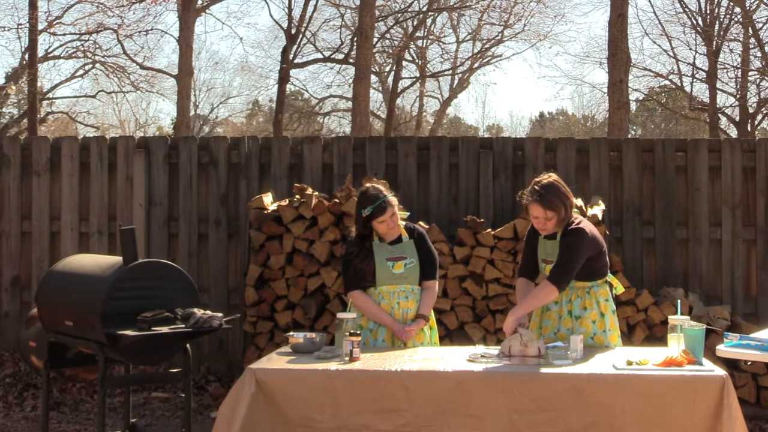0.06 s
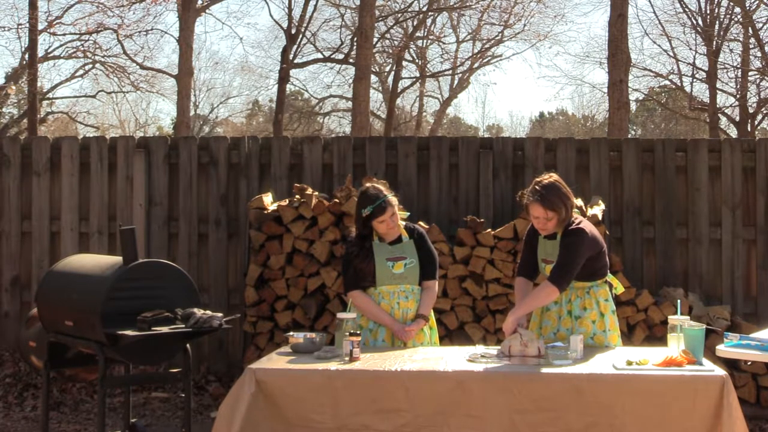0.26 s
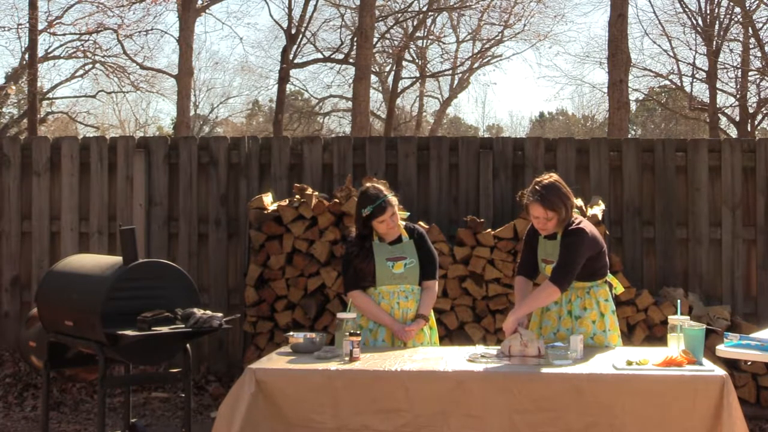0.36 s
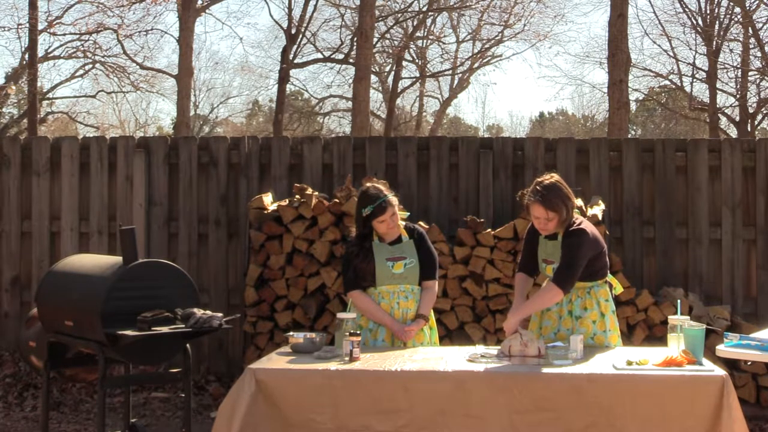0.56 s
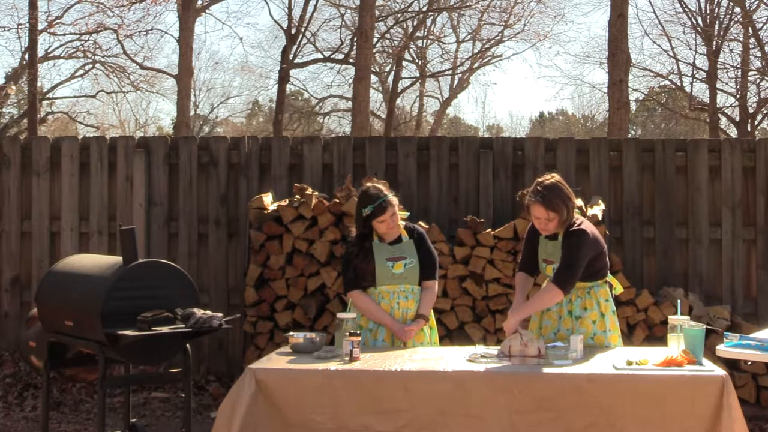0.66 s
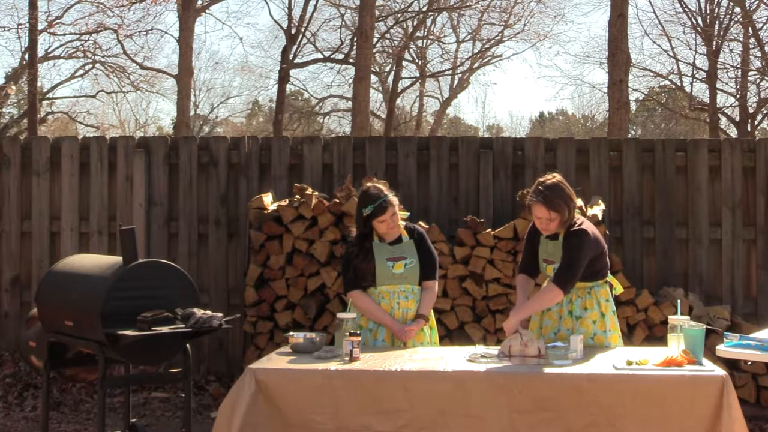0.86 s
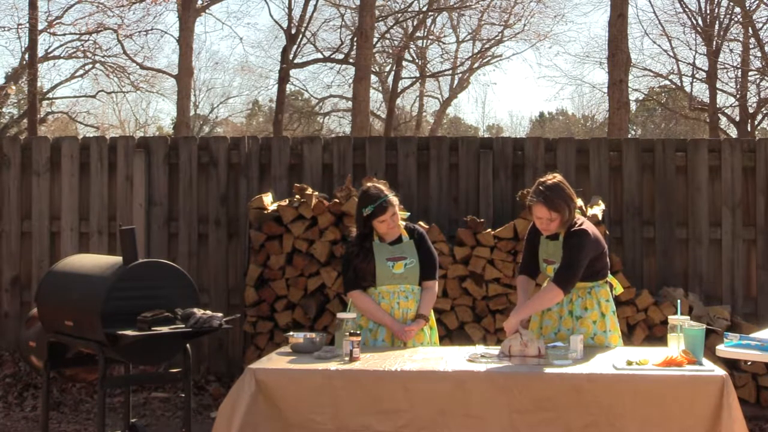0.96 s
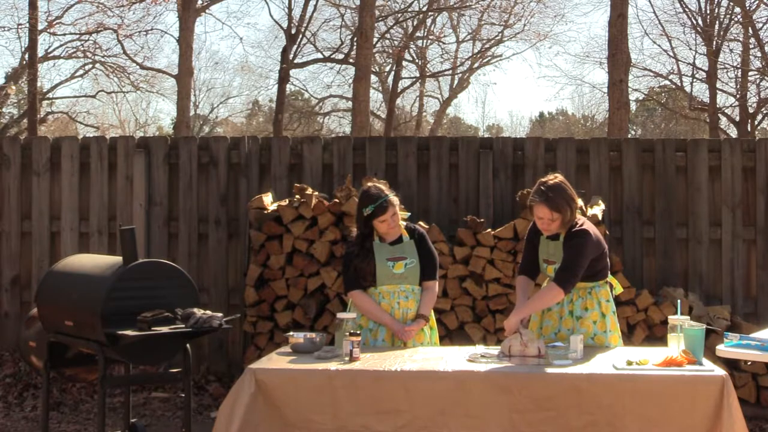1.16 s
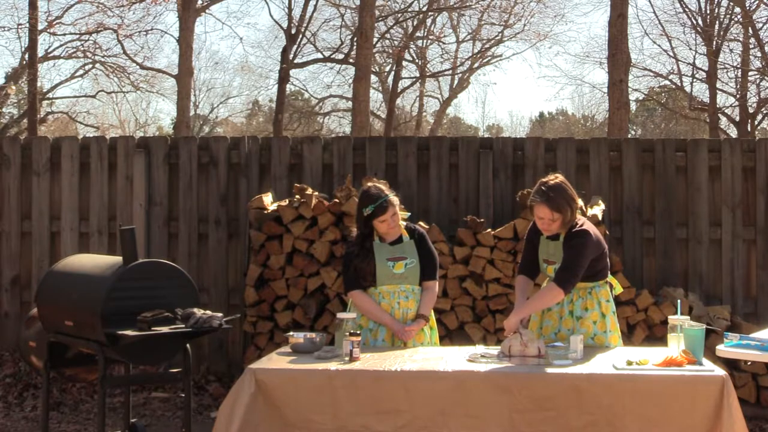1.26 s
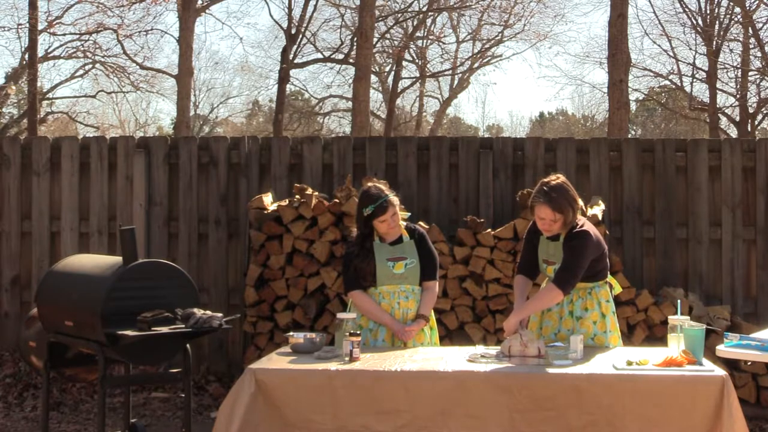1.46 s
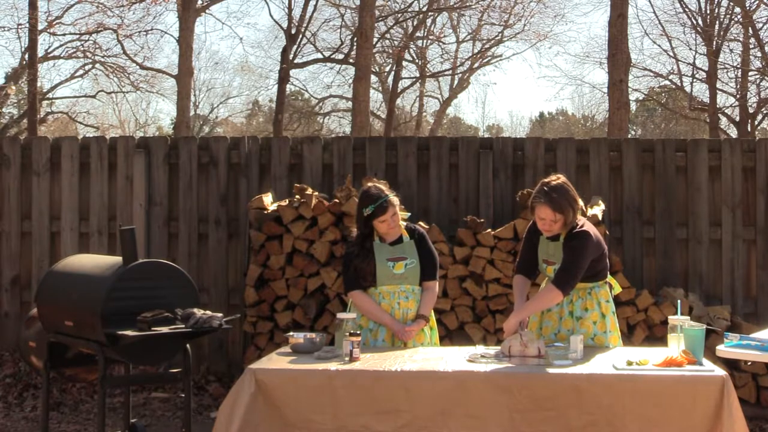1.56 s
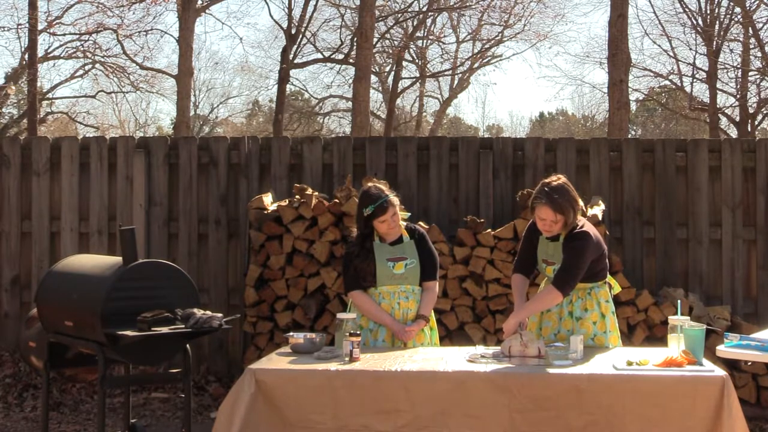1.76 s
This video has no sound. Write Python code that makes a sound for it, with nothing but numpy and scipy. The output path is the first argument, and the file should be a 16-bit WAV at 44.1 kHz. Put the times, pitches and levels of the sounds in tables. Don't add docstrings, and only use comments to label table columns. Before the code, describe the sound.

Kitchen shears snap through chicken bone near the start, one bright, dry crack with quick yard reflections and a soft diffuse tail; afterward only faint low hum, distant traffic and tiny wet ticks, picked up by one microphone.

```python
import sys
import numpy as np
from scipy import signal
from scipy.io import wavfile
from scipy.ndimage import uniform_filter1d

SR = 44100
rng = np.random.default_rng(int(sys.argv[2]) if len(sys.argv) > 2 else 0)


def bounce(signal):
    frames = np.transpose(np.atleast_2d(signal))
    limited = np.clip(frames, -1, 1)
    pcm = np.round(limited * 32767).astype(np.int16)
    wavfile.write(sys.argv[1], SR, pcm)


def voltage_ratio(decibels):
    exponent = np.asarray(decibels, float) / 20
    return 10 ** exponent


N = 79380

# (time [s], level [dB])
FRACTURES = [
    (.20335, -26),
    (.20365, -10),
    (.20408, -11),
    (.20535, -12),
    (.2062, -16),
    (.2078, -23),
    (.2088, -25),
    (.2100, -25),
    (.2113, -28),
]
# (frequency [Hz], level [dB], T60 [s])
BLADE_MODES = [(1800, -7, .007), (2280, -3, .008), (2800, -14, .007), (3550, -11, .007), (4250, -2, .008),
               (4710, 0, .008), (5510, -3, .008), (6600, -14, .007), (7130, -12, .007), (7900, -15, .006),
               (8900, -14, .004), (10200, -13, .003), (12500, -13, .003), (15000, -13, .003)]
# (frequency [Hz], level [dB], T60 [s])
STEEL_MODES = [(4199, -45, .4), (4320, -48, .5), (4770, -46, .4)]
# (level [dB], centre [Hz], bandwidth [Hz])
NEAR_REFLECTION = (-6, 4700, 2000)
# (arrival [s], level [dB], centre [Hz], bandwidth [Hz], smear [s])
REFLECTIONS = [(0.213, -17, 7800, 1500, 0.0012), (0.213, -31.5, 11800, 2040, 0.0022),
               (0.2172, -32, 2300, 1500, .003), (0.218, -25.5, 4230, 1500, 0.0044),
               (0.2215, -32.5, 2079, 1187, .007), (0.224, -31.5, 4500, 1500, 0.0043),
               (0.227, -30.5, 7400, 2000, 0.0062), (0.2284, -26.5, 4176, 2000, 0.0036),
               (.228, -41, 2012, 1200, 0.0059), (0.236, -39.5, 4992, 4009, .012),
               (.266, -43.5, 2100, 1190, 0.016), (.271, -38, 4280, 790, 0.0099),
               (0.264, -42.5, 6800, 3560, 0.014), (0.254, -67, 12000, 9000, 0.018),
               (0.311, -51.5, 2200, 1500, 0.015), (0.313, -69, 7850, 6030, 0.0079),
               (.333, -81, 6500, 2830, 0.0076), (0.402, -60, 3040, 5000, 0.0029),
               (0.411, -57, 10000, 14000, 0.0048), (0.411, -64.5, 8540, 6000, 0.018),
               (0.435, -64.5, 4400, 5000, .012)]
# (frequency [Hz], level [dB], T60 [s])
SCATTER = [(1300, -25.5, 0.23), (1798, -16.5, 0.44), (2360, -18.5, 0.57), (3200, -20.5, 0.34),
           (4370, -17.5, .6), (6500, -16, .3), (9000, -19, 0.24), (12770, -20, .22)]
# (time [s], level [dB], frequency [Hz], T60 [s])
TICKS = [(0.145, -65.5, 8600, .04), (.154, -58.5, 2220, .06), (0.1614, -42, 2337, 0.028),
         (0.1618, -45, 9000, .005), (.174, -51.5, 2140, 0.15), (.166, -64.5, 4500, 0.18),
         (.508, -59.5, 7980, 0.0065), (.655, -62, 7500, .01), (.659, -68, 7400, .04),
         (0.694, -59.5, 6920, 0.0055), (1.1615, -63, 6500, 0.015), (1.1617, -60.5, 2660, .02),
         (1.1917, -60, 2620, .02), (1.2865, -61, 4000, .003), (1.392, -61, 7000, 0.0026),
         (1.501, -61.5, 3500, .02), (1.5406, -56.5, 3200, 0.0047), (1.618, -57, 7500, 0.0032),
         (1.62, -62, 6970, 0.0045), (1.6255, -51.5, 5934, 0.0026), (1.632, -65.5, 7100, 0.11)]
# (time [s], level [dB], centre [Hz], bandwidth [Hz], fade [s])
BOARD_KNOCKS = [
    (.203, -40.5, 620, 200, 0.011),
    (.203, -44, 480, 141, 0.013),
    (.204, -40, 1300, 400, 0.003),
    (.212, -55, 1004, 400, .02),
    (.302, -51, 674, 50.4, 0.017),
    (.338, -56, 703, 60, 0.019),
]
# (time [s], frequency [Hz], level [dB])
STRONG_HUM = [
    (0, 103.7, -52),
    (.5, 103, -54.5),
    (.6, 103.6, -61.5),
    (.72, 101.7, -53),
    (1.44, 101.9, -53.5),
    (1.53, 101.2, -64),
    (1.8, 100.8, -60),
]
# (frequency ratio [1], level [dB])
OVERTONES = [(1.168, -16), (1.45, -18), (2, -19)]
# (time [s], frequency [Hz], level [dB])
WEAK_HUM = [
    (0, 84, -55.5),
    (.12, 83.6, -54.5),
    (.3, 86, -58),
    (1.0, 87.66, -65.5),
    (1.45, 88.88, -62.5),
    (1.8, 90.2, -60.5),
]
# (frequency [Hz], density [dB per Hz])
AIR_SPECTRUM = [(25, -40.5), (60, -14.5), (130, -16.5), (260, -26), (600, -22.5), (1500, -43.5),
                (4500, -46.5), (16000, -60)]

CRACK_DB, CRACK_HZ, CRACK_S = -15.5, 9000, .0015
NEAR_DELAY_S = .0107
CREAK_S, CREAK_DB, CREAK_HZ, CREAK_RISE_DB_S = .193, -39.5, 2492, 1499.5
RUSTLE_DB, RUSTLE_PER_S = -77.5, 150
AIR_DB = -61.5
THIN_HZ = 1500
ONSET = 0.11
TOP_HZ = 15900


def snap():
    when, db = np.array(FRACTURES).T
    weight = rng.standard_normal((len(when), len(BLADE_MODES)))
    body = 0
    for k, (hz, level, t60) in enumerate(BLADE_MODES):
        strikes = spikes(when, voltage_ratio(db + 1.9 * weight[:, k]))
        body = body + (-1) ** k * voltage_ratio(level) * ring(strikes, hz, t60)
    crack = signal.fftconvolve(spikes(when, voltage_ratio(db)), fade(CRACK_S))[:N]
    return thin(body + voltage_ratio(CRACK_DB + 23) * band(crack, CRACK_HZ, 12000))


def steel():
    strike = spikes([FRACTURES[1][0]], [1.])
    return sum(voltage_ratio(db + 2 * walk(40)) * ring(strike, hz, t60) for hz, db, t60 in STEEL_MODES)


def scatter():
    wash = 0
    for hz, db, t60 in SCATTER:
        tail = fade(t60 / np.log(1000), size=N // 2)
        tail = band(band(tail, hz, hz / 3), hz, hz / 2.16)
        wash = wash + voltage_ratio(db + 10 + 3.1 * walk(90)[:N // 2]) * tail
    return place(wash, FRACTURES[0][0] + .002)


def yard(crack):
    db, hz, width = NEAR_REFLECTION
    near = voltage_ratio(db) * band(np.roll(crack, int(NEAR_DELAY_S * SR)), hz, width)
    later = sum(puff(db, s, hz, width, smear) for s, db, hz, width, smear in REFLECTIONS)
    return thin(near + later + steel()) + scatter()


def creak():
    t = np.arange(N) / SR
    load = voltage_ratio(-CREAK_RISE_DB_S * np.maximum(CREAK_S - t, 0)) * (t < FRACTURES[0][0])
    noise = thin(band(rng.standard_normal(N), CREAK_HZ, 2900))
    return voltage_ratio(CREAK_DB + 2 * walk(150)) * load * noise


def board():
    return sum(puff(db, s, hz, width, smear) for s, db, hz, width, smear in BOARD_KNOCKS)


def ticks():
    return sum(puff(db - 4, s, hz, max(hz / 5, 15 / t60), t60 / np.log(1000)) for s, db, hz, t60 in TICKS)


def rustle():
    chance = rng.random((2, N))
    struck = chance[0] < RUSTLE_PER_S / SR * voltage_ratio(5 * walk(6))
    strength = voltage_ratio(RUSTLE_DB - 2.5 * np.log(chance[1] + 1e-9))
    return band(struck * strength, 5500, 6000)


def hum(curve, overtones=()):
    s, hz, db = np.array(curve).T
    t = np.arange(N) / SR
    speed = np.interp(t, s, hz) * (1 + 0.0077 * walk(7.2))
    phase = 2 * np.pi * np.cumsum(speed) / SR
    tone = np.sin(phase)
    for ratio, level in overtones:
        tone = tone + voltage_ratio(level + 4 * walk(5.5)) * np.sin(ratio * phase)
    return np.sqrt(2) * voltage_ratio(np.interp(t, s, db) + 1.1 * walk(29)) * tone


def air():
    hz_points, db_points = np.array(AIR_SPECTRUM).T
    out, swell = 0, walk(3.2)
    for hz in 25 * 2 ** np.arange(0, 9.6, .5):
        db = np.interp(np.log(hz), np.log(hz_points), db_points) + 0.82 * swell + 0.74 * walk(9)
        noise = band(rng.standard_normal(N), hz, hz / 2)
        out = out + voltage_ratio(db) * band(noise, hz, hz / 2)
    return out * voltage_ratio(AIR_DB + 3.5) / np.std(out)


def ring(x, hz, t60):
    pole = np.exp(2j * np.pi * hz / SR - np.log(1000) / (t60 * SR))
    return signal.lfilter([1], [1, -pole], x).imag


def band(x, hz, width):
    quality = hz / min(width, .4 * SR)
    return signal.lfilter(*signal.iirpeak(min(hz, .45 * SR), quality, SR), x)


def thin(x):
    return signal.sosfilt(signal.butter(4, THIN_HZ, "high", fs=SR, output="sos"), x)


def spikes(times, gains):
    return np.bincount(np.round(np.asarray(times) * SR).astype(int), gains, N)[:N]


def fade(s, size=8192):
    burst = rng.standard_normal(size) * np.exp(-np.arange(size) / (s * SR))
    return burst / np.sqrt(np.sum(burst ** 2))


def puff(db, s, hz, width, smear):
    burst = fade(smear)
    rise = 1 - np.exp(-np.arange(len(burst)) / (ONSET * smear * SR))
    burst = band(band(burst * rise, hz, width), hz, 2 * width)
    return voltage_ratio(db) * place(burst, s) * np.sqrt(smear * SR / 2 / np.sum(burst ** 2))


def place(sound, s):
    return np.roll(np.r_[sound, np.zeros(N - len(sound))], int(s * SR))


def walk(rate):
    k = int(SR / rate)
    held = np.repeat(rng.standard_normal(N // 20), k)[:N]
    return 2.2 * uniform_filter1d(uniform_filter1d(held, k), k)


def scene():
    crack = snap()
    table = creak() + board() + ticks() + rustle()
    background = hum(STRONG_HUM, OVERTONES) + hum(WEAK_HUM) + air()
    return (crack + yard(crack) + table + background)[None]


def roll_off(x):
    return signal.sosfilt(signal.butter(12, 16810, fs=SR, output="sos"), x)


def record(dry):
    low_pass = signal.ellip(8, .3, 60, TOP_HZ, fs=SR, output="sos")
    mix = signal.sosfilt(low_pass, dry)
    return roll_off(mix)


dry = scene()
out = record(dry)
bounce(out)
```